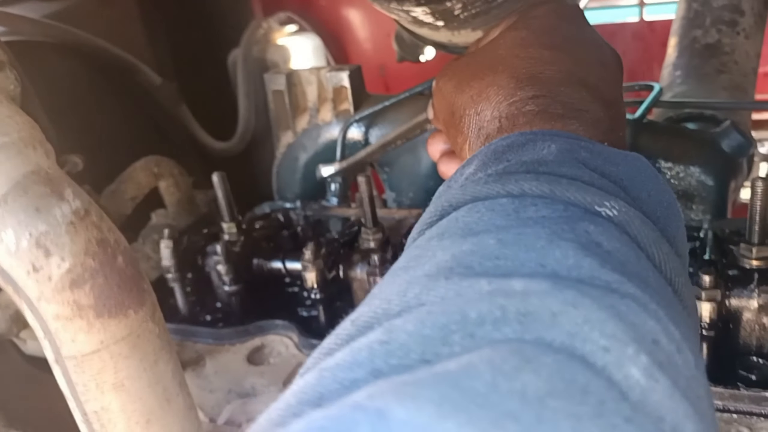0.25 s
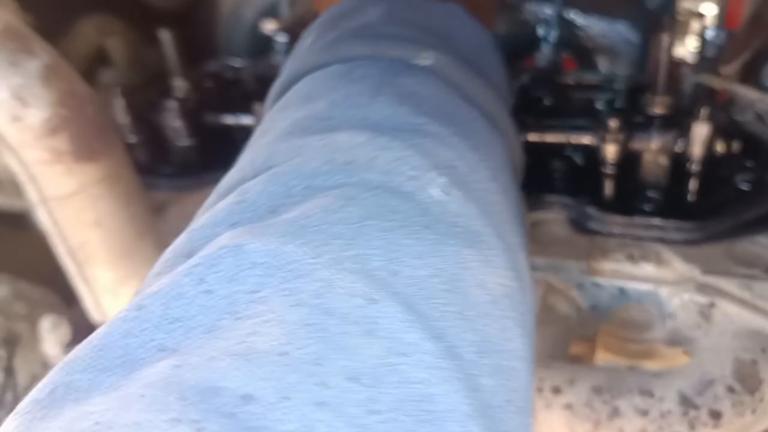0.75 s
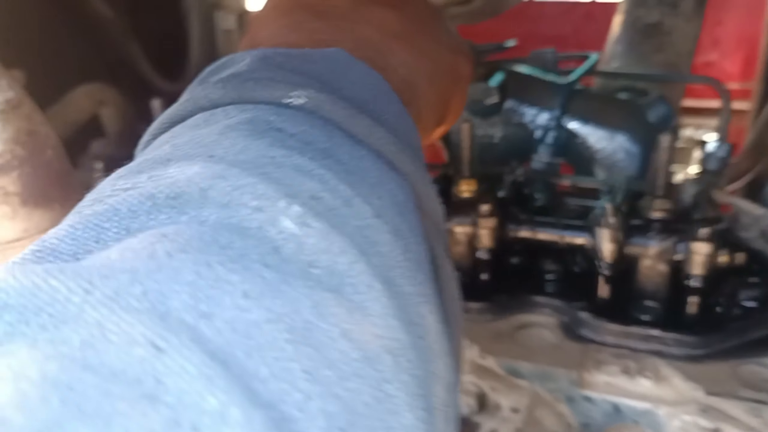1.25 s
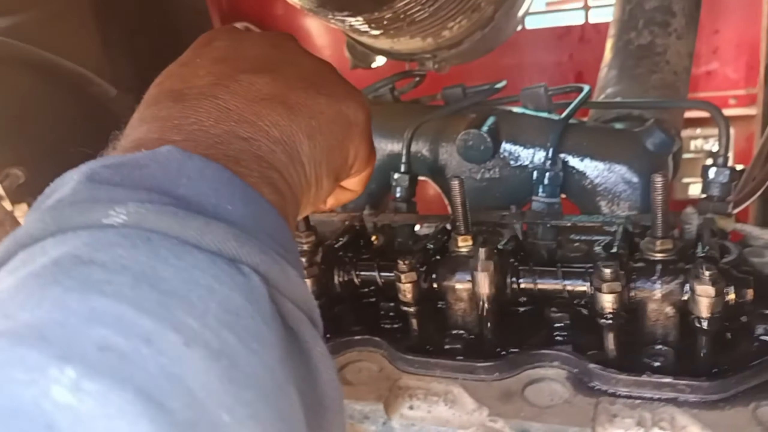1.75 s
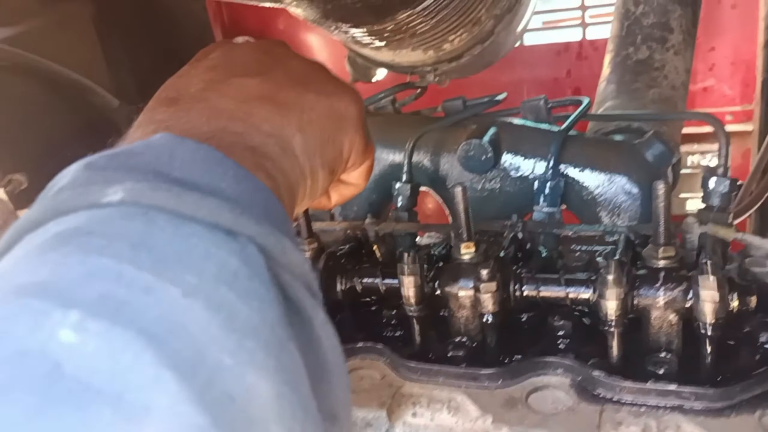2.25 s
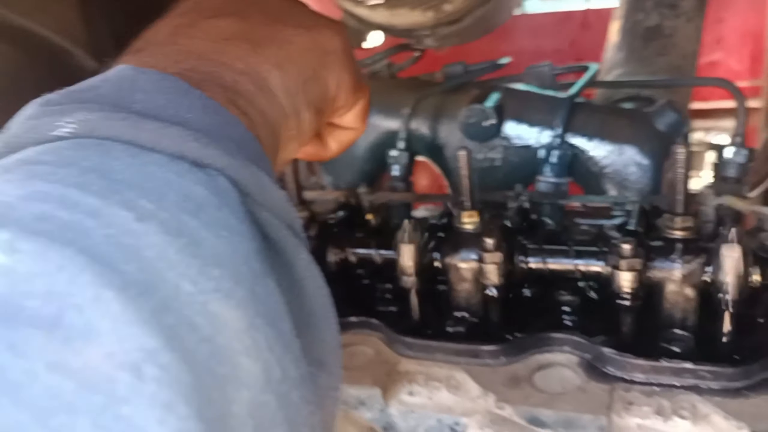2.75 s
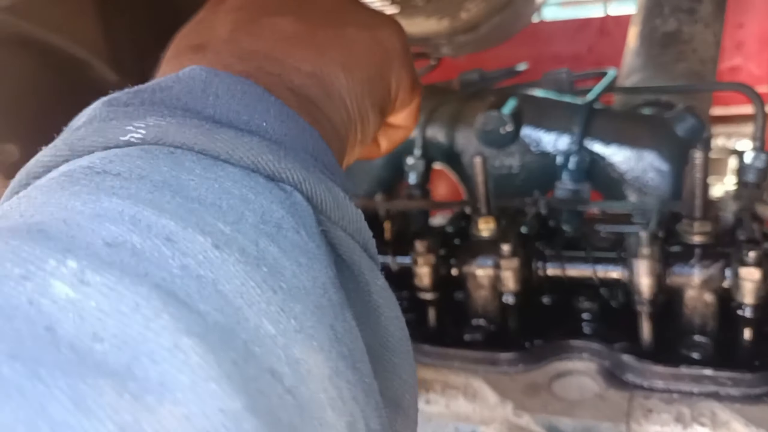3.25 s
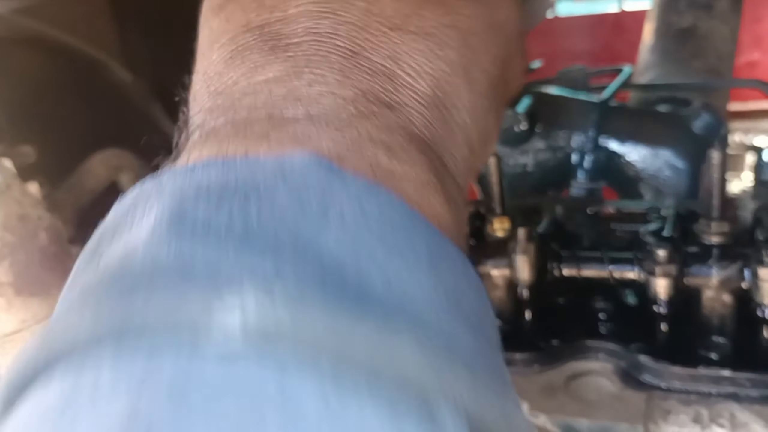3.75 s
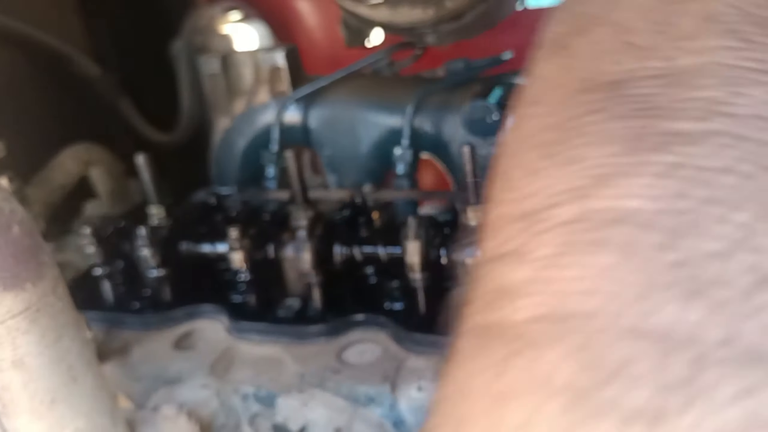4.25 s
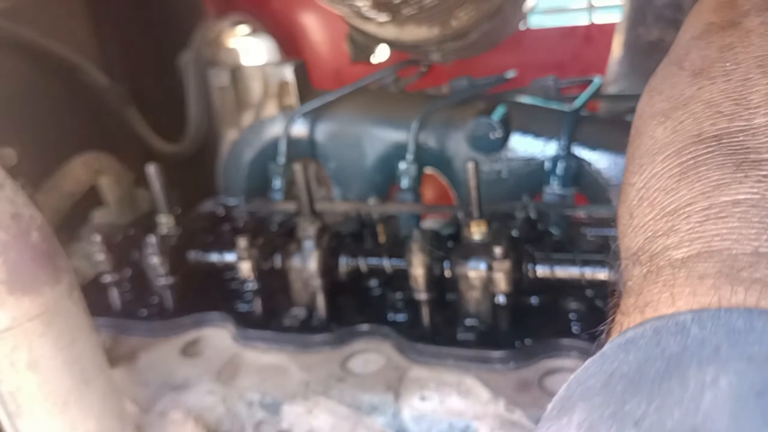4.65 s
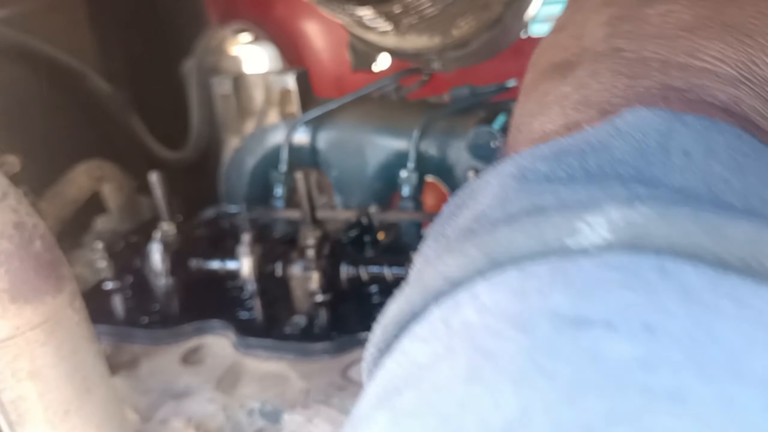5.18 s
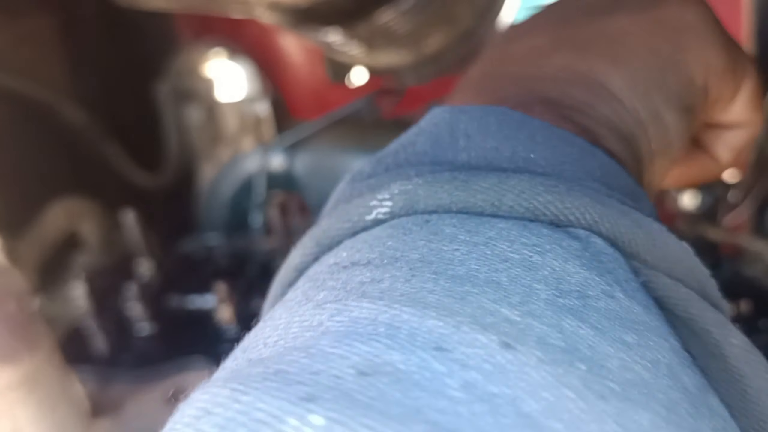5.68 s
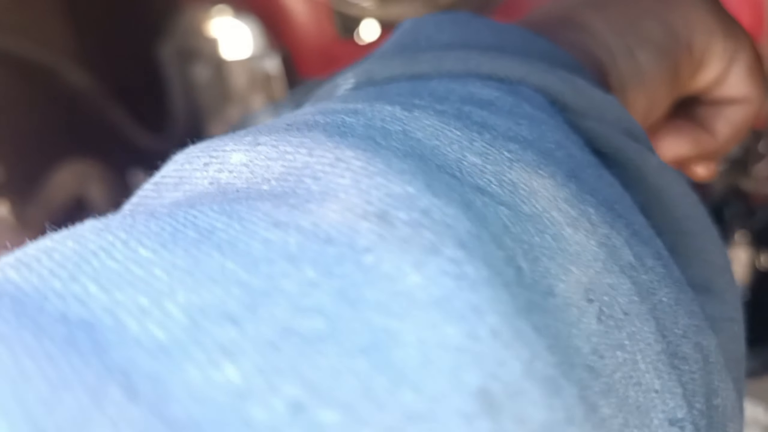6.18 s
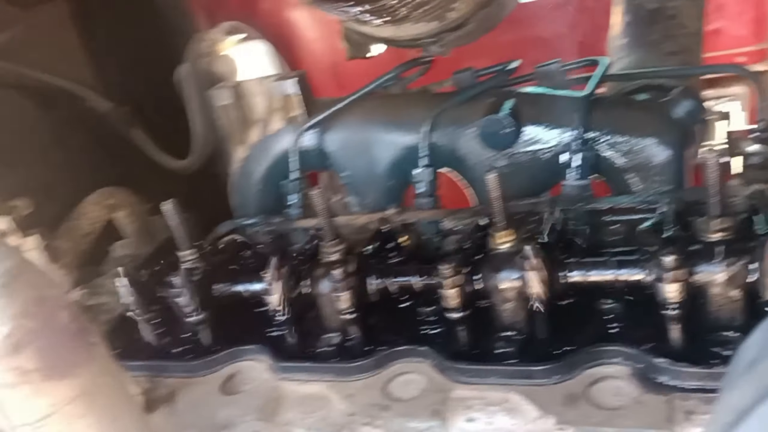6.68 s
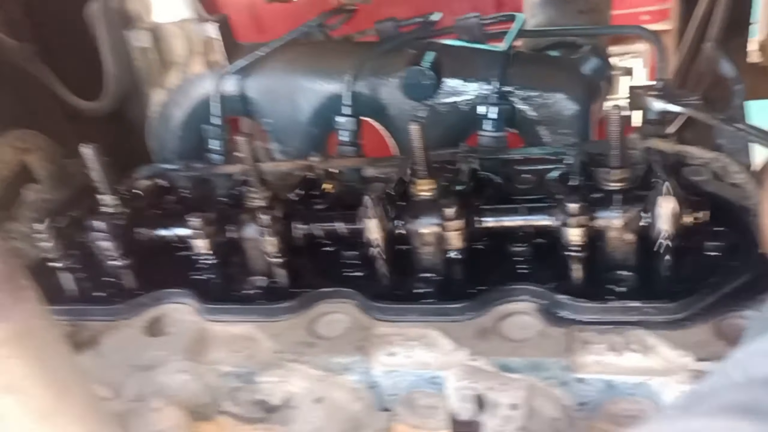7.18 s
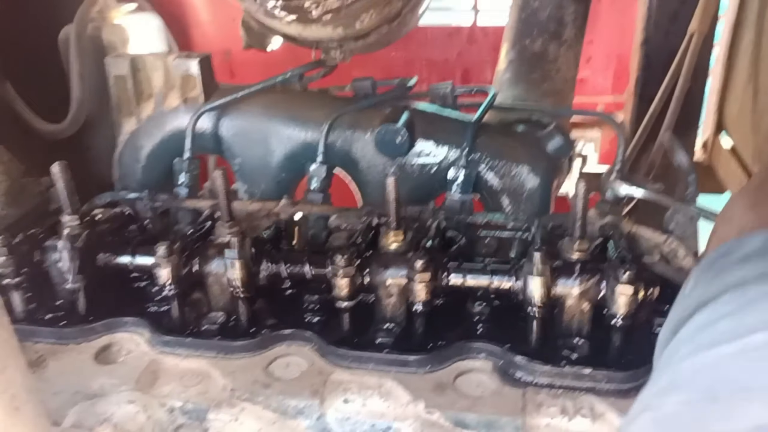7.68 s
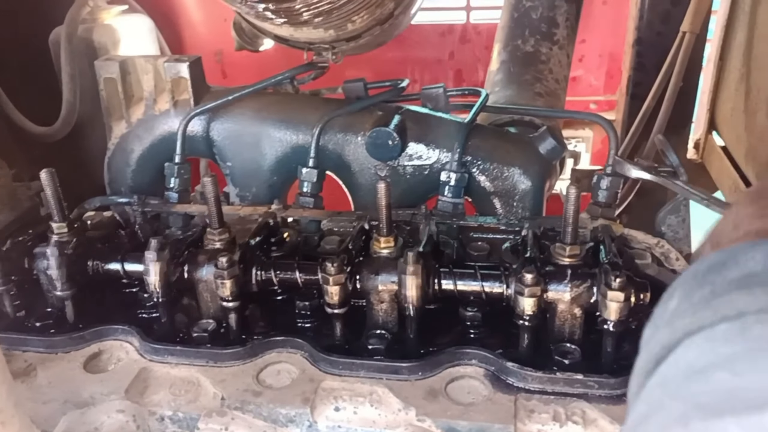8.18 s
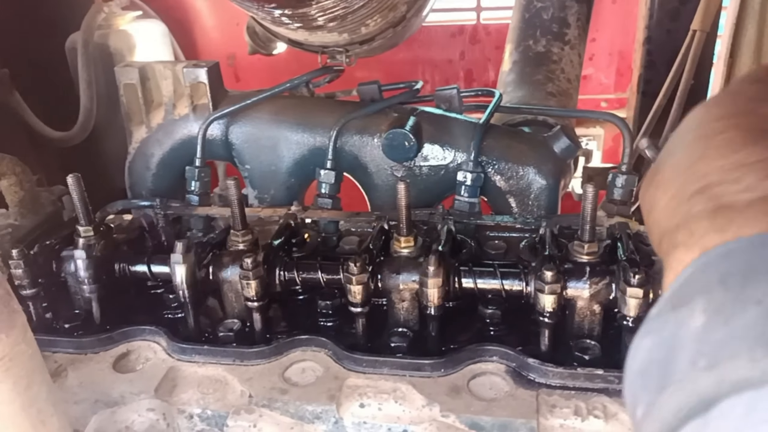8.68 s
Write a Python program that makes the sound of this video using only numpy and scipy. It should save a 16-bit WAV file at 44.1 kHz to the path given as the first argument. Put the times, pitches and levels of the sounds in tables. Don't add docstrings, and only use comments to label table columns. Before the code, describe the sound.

From 0 seconds a four-cylinder diesel is already idling loudly, very close, valve gear exposed. A steady drone around 50 Hz with many higher harmonics carries about fifty gritty knocks per second; one cylinder hits hardest, giving a rough, lurching repeat twelve times a second. Rockers and valves add short, dry metallic rings around 1.4 to 2 kHz and finer ticks above. Fan air and block rumble fill the gaps. Speed rises very slightly near 0.9, then settles. Clatter is a touch duller around 1, more open from 2.7 to 4, covered again near 5.6. At 6.4 everything stops dead, pure silence until about 7.0. The engine snaps back, slightly recoloured and more open, dips faintly around 7.4, recovers by 7.9 and continues steadily to the end near 9. Wide, dry stereo, with steeply limited treble.

```python
import sys
import numpy as np
from scipy import signal
from scipy.fft import rfft, irfft, next_fast_len
from scipy.io import wavfile

SR = 44100
rng = np.random.default_rng(int(sys.argv[2]) if len(sys.argv) > 2 else 0)


def to_wav(sig):
    pcm = np.clip(np.atleast_2d(sig), -1, 1) * 32767
    pcm = np.round(pcm).astype(np.int16)
    wavfile.write(sys.argv[1], SR, pcm.T)


def amplitude_ratio(level_db):
    exponent = np.asarray(level_db, float) / 20
    return 10 ** exponent


N = 393813
MUTE_S = (6.4212, 6.968)
RIGHT_LAG_S = .0005

# [f/Hz, level/dB per Hz]
LEFT_PORT = [(700, -73.5), (1000, -55), (1200, -49.5), (2500, -58.5), (3000, -64), (4000, -63.5),
             (5200, -69), (6700, -88), (7300, -80), (8000, -69.5), (9500, -63), (11000, -74), (12600, -74),
             (15500, -85.5)]
# [f/Hz, level/dB per Hz]
RIGHT_PORT = [(700, -87.5), (1000, -51), (1250, -46), (2500, -55.5), (3200, -63.5), (4000, -60.5),
              (5300, -57.5), (7000, -63.5), (8000, -75), (8900, -91), (10000, -87.5), (11200, -97),
              (12500, -66.5), (15500, -79.5)]


def at_hz(points, hz):
    points_hz, points_db = np.transpose(points)
    return np.interp(np.log(hz + 1), np.log(points_hz), points_db)


def drift(rate_hz, size=1):
    r = np.exp(-128 * np.pi * rate_hz / SR)
    noise = rng.standard_normal(N // 64 + 1002)
    slow = signal.lfilter([1], [1, -2 * r, r * r], noise)[1000:]
    return np.interp(np.arange(0, N, size) / 64, np.arange(len(slow)), slow / slow.std())


def strikes(cycle, place, db, late_s):
    at = np.flatnonzero(np.diff(np.floor(cycle - place)) > 0)
    late = (late_s[:len(at)] * SR).astype(int)
    clicks = np.full(N, 1e-18)
    clicks[np.clip(at + late, 0, N - 1)] = amplitude_ratio(db[:len(at)])
    return clicks


def ring(clicks, hz, t60_s):
    r = amplitude_ratio(-60 / (t60_s * SR))
    w = 2 * np.pi * hz / SR
    return signal.lfilter([0, np.sin(w)], [1, -2 * r * np.cos(w), r * r], clicks)


def to_ports(x, left_db, lag_s):
    return np.array([amplitude_ratio(left_db) * x, amplitude_ratio(-left_db) * np.roll(x, round(lag_s * SR))])


def lagged(hz):
    lag_from_hz = 780
    return np.exp(-2j * np.pi * RIGHT_LAG_S * hz ** 3 / (hz ** 2 + lag_from_hz ** 2))


def colour(pair, left, right):
    # [f/Hz, common share]
    likeness = [(60, 0.93), (300, 0.87), (640, 0.4), (1400, 0.34), (4000, 0.21), (8000, 0.09)]
    size = next_fast_len(N)
    hz = np.fft.rfftfreq(size, 1 / SR)
    first, other = rfft(pair, size)
    alike = np.clip(at_hz(likeness, hz), 0, 1)
    second = alike * first * lagged(hz) + np.sqrt(1 - alike ** 2) * other
    gains = amplitude_ratio(np.array([at_hz(left, hz), at_hz(right, hz)])) * np.sqrt(SR / 2)
    return irfft(gains * [first, second], size)[:, :N]


def hum(cycle):
    # [order of the cycle, level/dB rms]
    firing_orders = [(4, -18.5), (8, -24.5), (12, -25), (16, -26), (20, -21), (24, -28), (28, -38),
                     (32, -34), (36, -41), (52, -44)]
    # [order of the cycle, level/dB rms]
    between_orders = [(3, -45), (7, -42), (9, -36), (10, -35), (11, -35), (13, -38), (14, -35), (15, -30),
                      (17, -29), (18, -31), (19, -28), (21, -30), (22, -36), (23, -27), (25, -37),
                      (27, -39), (33, -35), (34, -30), (41, -45), (43, -43), (45, -44), (47, -43),
                      (50, -43), (59, -45)]
    # [order of the cycle, level/dB rms]
    belt_orders = [(6.03, -30), (17.64, -22), (35.28, -40)]
    uneven = [(0.15, -0.02), (0.108, 0.06), (0.046, 0.43), (0.229, -0.48)]
    step = 16
    cycle = cycle[::step]
    out = 0
    for order, db in firing_orders + between_orders + belt_orders:
        lead, turn = uneven[int(order) % 4]
        turns = order * (cycle + lead + .0011 * order) + turn
        turns = turns + .03 * drift(3, size=step) * order / 20
        level_db = db + 0.61 * drift(3.9, size=step) * order / 12
        out = out + amplitude_ratio(level_db) * np.cos(2 * np.pi * turns)
    fine = signal.resample_poly(out, step, 1, padtype="line")[:N]
    return to_ports(np.sqrt(2) * fine, left_db=0.96, lag_s=0.00012)


def knock(cycle, path_db):
    # [place in cycle/0-1, level at 1-3 kHz/dB, level at 3-7 kHz/dB, level above/dB]
    firings = [
        (.963, 4, 6.5, 8),
        (.2, 2.5, 5, 4),
        (.46, 0, 2, 3),
        (.7, -.5, 1.5, 4),
    ]
    bands = [  # edges/Hz, burst/dB, steady/dB
        ([500, 2800], -5.5, -4),
        ([2800, 7400], -3.3, -7),
        ([7400, 18000], -2.3, -9),
    ]
    luck = rng.standard_normal((len(firings), 5, 128))
    grit = amplitude_ratio(1.0 * np.minimum(rng.exponential(1, N), 4)) * rng.standard_normal((2, N))
    steady = rng.standard_normal((2, N))
    s = np.arange(2048) / SR
    envelope = (1 - np.exp(-s / .0012)) * np.exp(-(s / .0075) ** 1.5)
    out = 0
    for k, (edges_hz, burst_db, steady_db) in enumerate(bands):
        hits = 0
        for row, own in zip(firings, luck):
            hit_db = row[1 + k] + .6 * own[0] + 1.3 * own[1 + k]
            hits = hits + strikes(cycle, row[0], hit_db, .0004 * own[4])
        burst = signal.fftconvolve(hits, envelope)[:N]
        mixed = amplitude_ratio(burst_db) * burst * grit + amplitude_ratio(steady_db) * steady
        sos = signal.butter(3, edges_hz, "band", fs=SR, output="sos")
        out = out + amplitude_ratio(path_db[k]) * signal.sosfilt(sos, mixed)
    return colour(out, LEFT_PORT, RIGHT_PORT)


def valve_gear(cycle, path_db, later):
    # [place in cycle/0-1, f/Hz, level/dB, t60/s]
    contacts = [(.968, 1414, -11.5, .04), (.24, 1450, -15, .033), (.97, 1900, -19.5, .02),
                (.17, 1430, -19, .025), (.99, 2100, -29, .05), (.26, 2000, -23, .045),
                (.975, 3980, -28.5, .06), (.275, 3930, -30, .04), (.485, 3950, -31, .035),
                (.195, 5240, -28, .045), (.99, 5600, -29, .03), (.735, 5600, -33.5, .024),
                (.49, 3500, -34, .02), (.255, 590, -18.5, .035), (.775, 830, -21, .025),
                (.985, 2450, -19.5, .025), (.01, 560, -26, .05), (.54, 1950, -25, .03),
                (.52, 1650, -25, .021), (.76, 2300, -28.5, .02), (.225, 1190, -27, .03),
                (.98, 1650, -23, .025), (.225, 1650, -23, .025), (.51, 820, -24, .02)]
    moved_knock_db = -2.5
    out = np.zeros((2, N))
    for place, hz, db, t60_s in contacts:
        luck = rng.standard_normal((2, 128))
        clicks = strikes(cycle, place, db + 2.0 * luck[0], .00011 * luck[1])
        rung = ring(clicks, hz, t60_s)
        if 3800 < hz < 4200:
            rung = np.where(later, ring(clicks, hz * 1.03, t60_s), rung)
        gain_db = 2 * path_db[int(hz > 2800)] + moved_knock_db * later * (1300 < hz < 2800)
        left_db = (at_hz(LEFT_PORT, hz) - at_hz(RIGHT_PORT, hz)) / 2
        out += to_ports(rung * amplitude_ratio(gain_db), left_db, lag_s=RIGHT_LAG_S if hz > 1700 else .0002)
    return signal.lfilter([.4], [1, -.6], out)


def rumble(cycle):
    # [f/Hz, level/dB per Hz]
    wash = [(30, -74.5), (60, -62.5), (120, -55), (170, -38.5), (230, -39.5), (340, -48.5), (430, -45.5),
            (600, -52), (800, -51.5), (950, -59), (1300, -81)]
    breath = amplitude_ratio(1.3 * np.cos(8 * np.pi * (cycle - .03)) + 1.0 * drift(5.8))
    return colour(breath * rng.standard_normal((2, N)), wash, wash)


def moved(x):
    # [f/Hz, level/dB]
    left_change = [(100, 0.5), (700, -0.2), (1100, 4), (1420, -1.5), (1900, 2.2), (2600, -1.8), (4700, 2),
                   (10000, 1.5)]
    # [f/Hz, level/dB]
    right_change = [(100, -0.8), (1050, -0.7), (1420, -2.5), (1900, -0.6), (3200, 1), (4000, -3.5),
                    (5600, -2), (7000, -0.8)]
    size = next_fast_len(N)
    hz = np.fft.rfftfreq(size, 1 / SR)
    gains = amplitude_ratio(np.array([at_hz(left_change, hz), at_hz(right_change, hz)]))
    return irfft(gains * rfft(x, size), size)[:, :N]


def scene():
    # [from t/s, engine speed/cycles per s]
    speed = [
        (0, 12.438),
        (.9, 12.577),
        (1.25, 12.5405),
        (3.25, 12.5343),
        (6.7, 12.52),
        (7.4, 12.36),
        (7.9, 12.499),
    ]
    # [t/s, opening/dB]
    arm = [
        (0, 0.8),
        (.9, 0.2),
        (1.6, 1.1),
        (2.7, 2),
        (4.0, 2),
        (5.6, 0.6),
        (6.4, 1.5),
        (7.0, 2.8),
        (8.9, 2.5),
    ]
    arm_shares = (0.05, .9, 0.48)
    start_cycle, skipped_cycles = -.293, -.426
    s = np.arange(N) / SR
    later = s > np.mean(MUTE_S)
    starts_s, cycles_per_s = np.transpose(speed)
    now = cycles_per_s[np.searchsorted(starts_s, s, "right") - 1]
    cycle = start_cycle + np.cumsum(now) / SR + skipped_cycles * later
    path_db = np.outer(arm_shares, np.interp(s, *np.transpose(arm)))
    engine = hum(cycle) + knock(cycle, path_db) + valve_gear(cycle, path_db, later) + rumble(cycle)
    return np.where(later, moved(engine), engine)


def band_limit(x):
    return signal.sosfilt(signal.butter(12, 15720, fs=SR, output="sos"), x)


def record(dry):
    s = np.arange(N) / SR
    left, right = .9 * np.tanh((np.abs(dry) / .9) ** 2) ** .5 * np.sign(dry)
    left = signal.sosfilt(signal.butter(4, 14000, fs=SR, output="sos"), left)
    right = signal.sosfilt(signal.butter(4, (8500, 13200), "bandstop", fs=SR, output="sos"), right)
    held = np.array([left, right]) * ((s < MUTE_S[0]) | (s > MUTE_S[1]))
    return band_limit(held)


dry = scene()
out = record(dry)
to_wav(out)
```